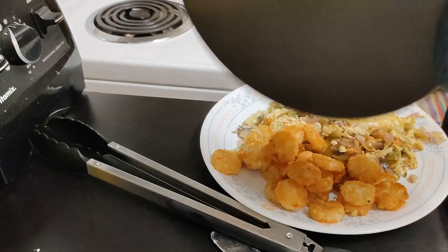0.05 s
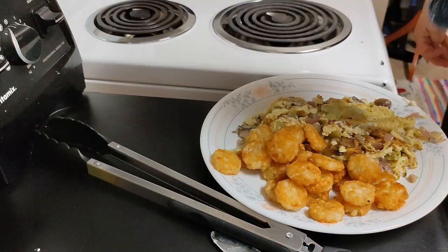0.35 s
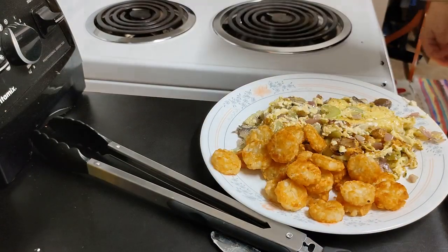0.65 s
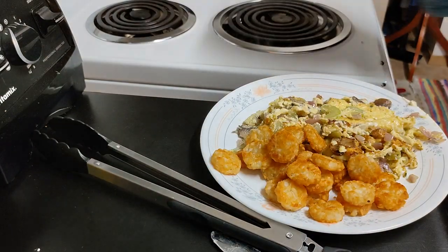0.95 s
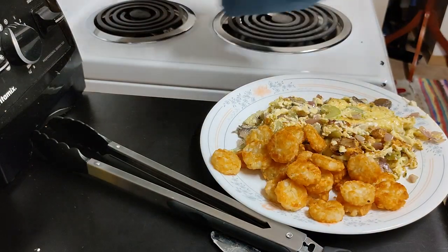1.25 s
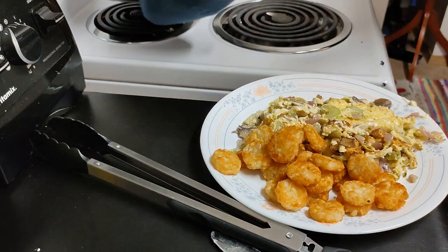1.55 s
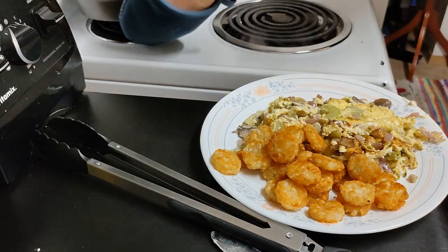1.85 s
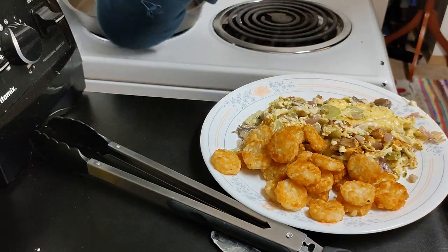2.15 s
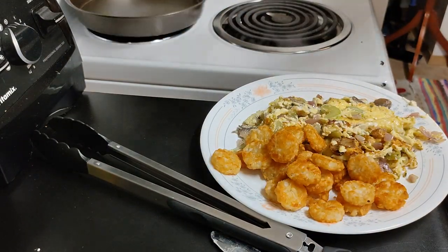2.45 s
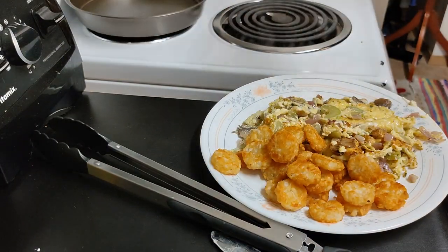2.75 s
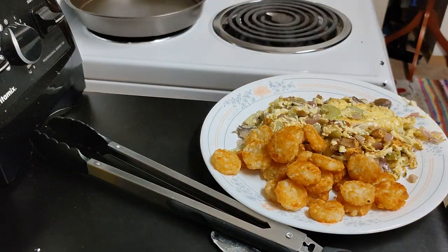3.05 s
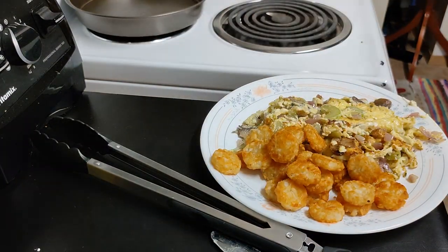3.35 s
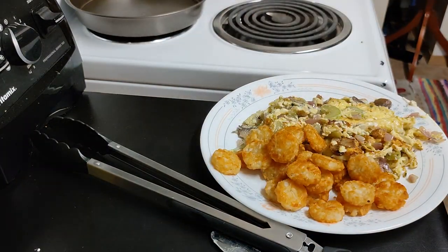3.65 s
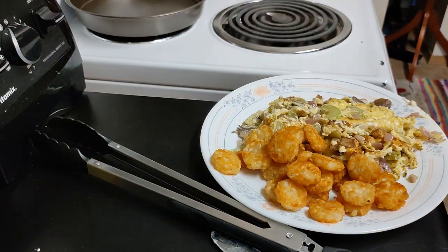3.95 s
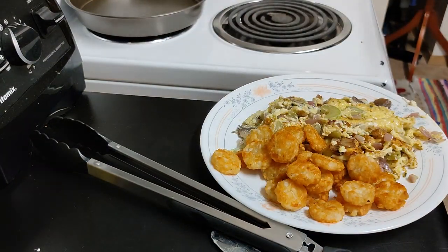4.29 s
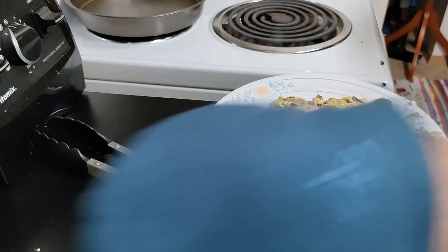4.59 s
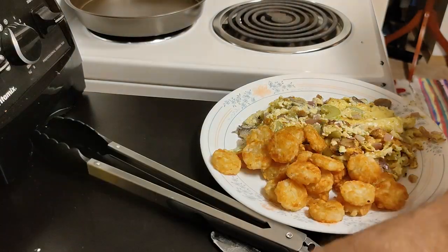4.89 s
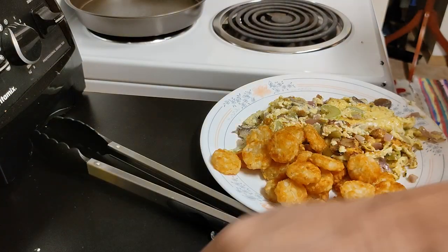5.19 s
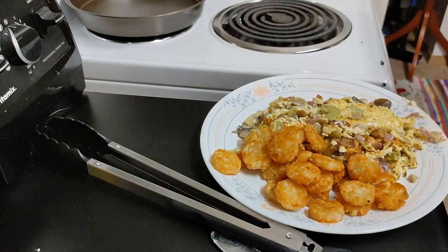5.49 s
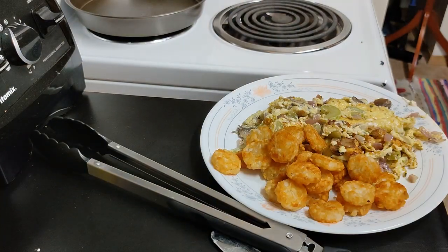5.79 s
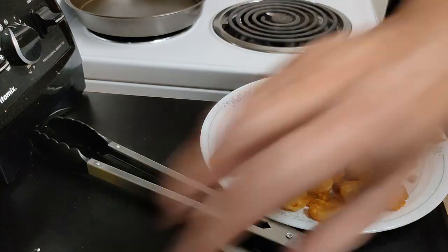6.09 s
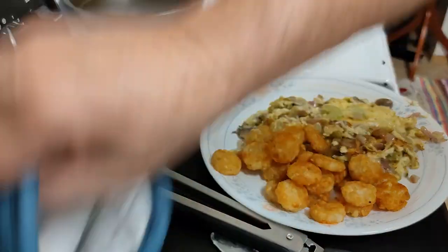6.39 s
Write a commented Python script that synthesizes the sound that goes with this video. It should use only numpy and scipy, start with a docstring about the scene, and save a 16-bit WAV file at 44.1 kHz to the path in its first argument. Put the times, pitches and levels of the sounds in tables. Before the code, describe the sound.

A steel pan clatters and rings onto a stove burner, followed by soft rustles and a padded thump in a quiet kitchen.

```python
"""In a small kitchen, a steel pan, just emptied onto a plate, is put back on an electric coil burner.
It strikes the coil and rings, then is pushed to the middle: it sticks and slips, the coil chatters
in its drip bowl and the sheet-metal stove top booms. Around it are soft swishes of the cook's clothes
and soles, small ticks, a tiny squeak and a padded thump on the counter. Cupboards and walls add a short
echo, and behind it all is a steady low hum of air, mains power and a fan motor."""
import sys
import numpy as np
from scipy import signal
from scipy.fft import rfft, irfft
from scipy.io import wavfile
from scipy.ndimage import uniform_filter1d

SR = 44100
rng = np.random.default_rng(int(sys.argv[2]) if len(sys.argv) > 2 else 0)


def unload_wav(signal):
    """Save mono or channel-first audio to the path in sys.argv[1] as 16-bit WAV at rate SR, clipped to [-1, 1]."""
    wavfile.write(
        sys.argv[1],
        SR,
        np.round(np.clip(np.atleast_2d(signal).T, -1, 1) * 32767).astype(np.int16),
    )


N = 283563
TIME = np.arange(N) / SR
TOP_HZ = 8600  # the treble ends here


# The pan lands on the coil, then rocks: t/s, clink level/dB, weight (boom compared with clink)/dB
PAN_HITS = [(1.8438, -27, -29.5), (1.848, -25, -15), (1.869, -39.5, 1.5), (1.884, -31.5, -10),
            (1.978, -36.5, -22.5), (2.0885, -45, -7), (2.194, -38, -44), (2.211, -40.5, -9),
            (2.233, -43, 0.5), (2.280, -27.5, -19.5), (2.320, -31, -9), (2.355, -28, -19.5),
            (2.403, -31.5, -16), (2.435, -36.5, -19), (2.500, -38, -17.5), (2.526, -43.5, -5),
            (2.579, -41, -12.5), (2.66, -51, -2.5), (2.722, -51, -15.5), (2.878, -73.5, 13)]

def pan_hits(flat_from_s=2.15, heavy_db=-42, stove_hz=862, rim_hz=6080, boom_rise_s=0.00063):
    """Each hit rings the steel. The more weight behind it, the more clank and boom join the clink."""
    out, attack = np.zeros(N), slice(SR // 30)
    for s, clink_db, weight_db in PAN_HITS:
        # heavy hits bring out the stove top, light ones the rim
        hz = stove_hz if clink_db + weight_db > heavy_db else rim_hz
        ring = steel_ring(flat=s > flat_from_s)
        ring = favour_pitch(ring, hz, boost_db=6.5, width_hz=190, patchy_db=4)
        boom, rest = split(ring, 1500)
        clank, clink = split(rest, 5000)
        boom = boom * (1 - np.exp(-TIME[:SR] / boom_rise_s))  # the stove top takes a moment to follow
        for band, db in (clink, 0), (clank, -3 + 0.56 * weight_db), (boom, weight_db):
            add(out, s, amp(clink_db + db) * band / rms(band[attack]))
    return out


# Clear notes of pan, coil and drip bowl, and the stove top's low boom at 146 Hz: f/Hz, level with pan on
# edge/dB, level with pan flat/dB
STEEL_NOTES = [(146, -16, -16), (600, -22, -14), (750, -11, -12), (845, -7, -18), (892, -11, -14),
               (980, -6, -16), (1400, -18, -17), (1620, -21, -17), (1715, -15, -13), (2052, -9, -17),
               (2480, -22, -15), (2818, -16, -17), (3405, -17, -21), (3680, -20, -9), (3833, -16, -13),
               (3940, -14, -15), (4204, -24, -8), (4651, -13, -25), (4753, -20, -15), (5297, -22, -10),
               (5612, -17, -14), (5852, -5, -3), (5935, -7, -15), (6170, -8, -8), (6312, -4, -10),
               (6365, -6, -9), (6563, -15, -9), (6670, -15, -6), (6895, -9, -17), (7240, -9, -14)]
# The clang, a blur of weaker steel notes: f/Hz, level/dB
CLANG_COLOUR = [(50, -27.5), (90, -14), (150, -15.5), (300, -9), (500, -10.5), (880, -7.5), (1250, -10.5),
                (1900, -6.5), (2350, -13.5), (3000, -9), (4800, -9), (5600, -1), (6300, -3), (7500, -0.5)]
# How long the clang lasts: f/Hz, time to fade by 60 dB/s
CLANG_FADE = [(150, 0.32), (800, 0.5), (2500, 0.4), (6500, 0.33)]

def steel_ring(flat, notes_db=-4.5, edge_fade_s=0.24, flat_fade_s=0.27, crack_db=3, crack_s=0.00062):
    """Struck steel gives a crack, a clang and clear notes whose mix depends on how the pan sits."""
    t = TIME[:SR]
    contact = grains(SR, spread_db=3) * (1 + amp(crack_db) * np.exp(-t / crack_s))
    clang = die_away(colour(contact, CLANG_COLOUR), CLANG_FADE)
    notes = sum(amp(flat_db if flat else edge_db) * sine(hz, t) for hz, edge_db, flat_db in STEEL_NOTES)
    notes *= amp(-60 * t / (flat_fade_s if flat else edge_fade_s))
    return clang / rms(clang) + amp(notes_db) * notes / rms(notes)


def push_force(start_s=2.205, peak_s=2.285, stop_s=2.7, rise_db_per_s=152.5, ease_db_per_s=72.5):
    """The hand's push grows quickly to a peak of 1, then eases off until the pan rests."""
    t = TIME - peak_s
    db = np.minimum(rise_db_per_s * t, -ease_db_per_s * t)
    return amp(db) * (TIME > start_s) * (TIME < stop_s)


def pan_slide(peak_db=-29.5, slips_per_s=300, spots=4):
    """The pushed pan sticks and slips on the coil, rapping it at a few spots."""
    out, force = np.zeros(N), amp(peak_db) * push_force()
    for _ in range(spots):
        strengths = 2 * rng.random(N) - 1
        slips = strengths * (rng.random(N) < slips_per_s / spots / SR)
        out += ring_through(force * slips / rms(slips), steel_ring(flat=True))
    return out / np.sqrt(spots)


def rim_skid(start_s=2.194, length_s=0.075, release_s=0.012, db=-35.5, hz=6560):
    """The rim skids on the coil with a short, bright scrape."""
    out, t = np.zeros(N), TIME[:SR // 5]
    scrape = favour_pitch(grains(len(t), spread_db=2.5), hz, boost_db=33, width_hz=620, patchy_db=8)
    release = np.exp(-np.maximum(t - length_s, 0) / release_s)
    add(out, start_s, amp(db) * scrape * release)
    return out


def rim_ping(start_s=2.722, db=-53, hz=5740, beat_hz=85, fade_s=0.36):
    """Two close notes of the rim beat against each other, so the ping flutters as it fades."""
    out, t = np.zeros(N), TIME[:SR]
    pair = np.sin(2 * np.pi * hz * t) + 0.5 * np.sin(2 * np.pi * (hz + beat_hz) * t)
    add(out, start_s, amp(db) * pair * amp(-60 * t / fade_s))
    return out


# The stove top's rumble under the sliding pan: f/Hz, level/dB
RUMBLE_COLOUR = [(30, -29.5), (68, -6.5), (100, -16.5), (145, 1), (250, -7.5), (420, -6.5), (1200, -43),
                 (3000, -68)]

def stove_rumble(peak_db=-53.5, follow=0.36):
    """The push shakes the sheet-metal stove top, whose rumble swells and fades with it."""
    rumble = colour(rng.standard_normal(N), RUMBLE_COLOUR)
    return amp(peak_db) * push_force() ** follow * rumble / rms(rumble)


# The stove top takes the pan's weight: t/s, level/dB, f/Hz
STOVE_THUMPS = [(2.211, -39, 658), (2.256, -41, 148.8), (2.32, -47, 146.8)]
# Something padded flops onto the counter: t/s, level/dB, f/Hz
COUNTER_THUMPS = [(4.937, -35, 130), (4.958, -34, 244), (4.967, -34, 142), (4.994, -41.5, 146)]

def thumps(stove_cycles=97, counter_cycles=14):
    """The thumped stove top rings on for many swings; the counter stops after a few."""
    out = np.zeros(N)
    for table, cycles in (STOVE_THUMPS, stove_cycles), (COUNTER_THUMPS, counter_cycles):
        for s, db, hz in table:
            add(out, s, amp(db) * bump(hz, fade_s=cycles / hz))
    return out


def bump(hz, fade_s, rise_s=0.0003, puff_db=-14, puff_s=0.006, puff_hz=700):
    """A soft knock sets a panel swinging, with a dull puff of noise."""
    t = TIME[:SR // 4]
    swing = -np.sin(2 * np.pi * hz * t) * amp(-60 * t / fade_s)
    puff, _ = split(rng.standard_normal(len(t)), puff_hz)
    puff = amp(puff_db) * puff / rms(puff) * np.exp(-t / puff_s)
    return (1 - np.exp(-t / rise_s)) * (swing + puff)


# Scuffs of cloth and soles: peak t/s, level/dB, rise time/s, boost of the lower part (body)/dB
COOK_SWISHES = [(.588, -52.5, .017, -12), (0.674, -43, .024, -4), (.975, -39.5, 0.0072, -2),
                (1.166, -45.5, .02, -4.5), (3.428, -45.5, .024, -2.5), (4.52, -62, .12, -4.5),
                (4.75, -60.5, .055, -2), (4.892, -46, .021, -2.5), (4.954, -46.5, .018, -2),
                (5.27, -65, .04, -10), (5.68, -64, 0.18, 1.5), (5.885, -53, .026, 4),
                (6.111, -62.5, 0.035, 8), (6.386, -56.5, 0.045, 3)]

def swishes(fall_per_rise=1.1):
    """The cook moves, and each short rub fades about as fast as it swells."""
    out = np.zeros(N)
    for peak_s, db, rise_s, body_db in COOK_SWISHES:
        start_s = max(peak_s - 3 * rise_s, 0)
        t = TIME[:SR] + start_s - peak_s
        swell = np.exp(-(np.minimum(t, 0) / rise_s) ** 2)
        fade = np.exp(-np.maximum(t, 0) / (fall_per_rise * rise_s))
        add(out, start_s, amp(db) * swell * fade * scuff_noise(len(t), body_db, spread_db=3))
    return out


# Small taps and clicks: t/s, level/dB, boost of the body/dB, f/Hz that the tapped thing favours
SMALL_TAPS = [(.929, -46.5, 2, 6370), (.9635, -44, 4.5, 3580), (1.154, -57, -9, 6300),
              (1.624, -62, 6, 6500), (2.901, -64.5, 11, 5100), (3.414, -51, -10, 6400),
              (4.363, -59, -16, 6700), (4.973, -52.5, 1.5, 900), (5.5193, -49.5, 1.5, 6100),
              (6.046, -56.5, 4, 3050), (6.387, -53, -1.5, 1990)]

def ticks(snap_db=7.5, snap_s=0.0027, bounce_s=0.0053, ring_db=-6, ring_s=0.047, knock_db=-12.5):
    """A tapped thing snaps, bounces once, rings briefly and knocks on the surface below."""
    out, t = np.zeros(N), TIME[:SR // 6]
    bounce = (t > bounce_s) * np.exp(-abs(t - bounce_s) / snap_s)
    snap_shape = amp(snap_db) * (np.exp(-t / snap_s) + bounce)
    ring_shape = amp(ring_db) * np.exp(-t / ring_s)
    for s, db, body_db, hz in SMALL_TAPS:
        noise = scuff_noise(len(t), body_db, spread_db=1)
        ring = favour_pitch(noise, 2100, boost_db=1, width_hz=260, patchy_db=3)
        snap = favour_pitch(ring, hz, boost_db=10.5, width_hz=630, patchy_db=0.5)
        add(out, s, amp(db) * (snap_shape * snap + ring_shape * ring))
        add(out, s, amp(db + body_db + knock_db) * bump(hz=622, fade_s=0.09))
    return out


# The mix of low and high in scuffs and taps: f/Hz, level/dB
SCUFF_COLOUR = [(100, -13.5), (350, -10.5), (700, -9), (1400, -13), (2300, -10.5), (3600, -7), (4800, -6.5),
                (6300, 3.5), (7400, 0.5)]

def scuff_noise(count, body_db, spread_db):
    """Rubbing makes a grainy hiss with more or less body below it."""
    noise = colour(grains(count, spread_db), SCUFF_COLOUR)
    body, hiss = split(noise / rms(noise), hz=4000)
    return hiss + amp(body_db) * body


def squeak(start_s=0.33, length_s=0.048, hz=3490, glide_hz=90, waver_hz=70, db=-61):
    """A tiny squeak rises in pitch, a little unsteadily."""
    out, progress = np.zeros(N), np.linspace(0, 1, int(length_s * SR))
    waver = uniform_filter1d(rng.standard_normal(N), size=100)[:len(progress)]
    pitch = hz + glide_hz * progress + waver_hz * waver / rms(waver)
    tone = np.sin(2 * np.pi * np.cumsum(pitch) / SR)
    add(out, start_s, amp(db) * np.sin(np.pi * progress) * tone)
    return out


# Steady kitchen air: f/Hz, level/dB
AIR_COLOUR = [(25, -30.5), (58, -17), (95, -34.5), (125, -10.5), (160, -0.5), (220, -0.5), (270, -7),
              (335, -5), (400, -14), (560, -21), (860, -20), (2000, -34), (4500, -29.5), (6500, -20.5)]

def air(db=-55.5, waver_db=2.2):
    """The air carries a low, fan-like rumble and a thin hiss that wavers slowly."""
    noise = colour(rng.standard_normal(N), AIR_COLOUR)
    rumble, hiss = split(noise / rms(noise), 3600)
    drift = sum(sine(hz, TIME) / np.sqrt(hz) for hz in np.geomspace(0.4, 9, 20))
    return amp(db) * (rumble + amp(-waver_db * drift / rms(drift)) * hiss)


# Tones of the mains power and a fan motor: f/Hz, level/dB
HUM_TONES = [(59.5, -88), (120, -75), (165, -66.5), (1241, -86.5)]

def hum():
    """The mains and the motor hum faintly, each tone at a steady pitch."""
    return np.sqrt(2) * sum(amp(db) * sine(hz, TIME) for hz, db in HUM_TONES)


# How long the kitchen's echo lasts: f/Hz, time to fade by 60 dB/s
ECHO_FADE = [(150, 0.39), (800, 0.32), (2500, 0.38), (6500, 0.34)]

def kitchen_echo(x, first_s=0.004, echoes_per_s=3000):
    """Sound bounces off cupboards and walls as many tiny echoes that blur together."""
    signs = rng.choice([-1., 1.], SR)
    echoes = signs * (rng.random(SR) < echoes_per_s / SR) * (TIME[:SR] > first_s)
    return ring_through(x, die_away(echoes, ECHO_FADE))


def amp(db):
    """Turns decibels into a number to multiply by."""
    return 10 ** (np.asarray(db) / 20)


def rms(x):
    """The average strength of a sound (root mean square)."""
    return np.sqrt(np.mean(x ** 2) + 1e-20)


def sine(hz, t):
    """A pure tone that starts at a random point in its swing."""
    return np.sin(2 * np.pi * (hz * t + rng.random()))


def look_up(table, hz):
    """Reads between a table's rows, on a scale of octaves."""
    f, value = np.transpose(table)
    return np.interp(np.log(hz + 1), np.log(f + 1), value)


def add(mix, s, sound):
    """Mixes a sound in at s seconds."""
    part = mix[max(round(s * SR), 0):][:len(sound)]
    part += sound[:len(part)]


def ring_through(x, tail):
    """Every sample of x sets off its own copy of the tail."""
    return signal.oaconvolve(x, tail / np.linalg.norm(tail))[:N]


def colour(x, table):
    """Turns each frequency up or down as the table says, and drops all above TOP_HZ."""
    hz = np.fft.rfftfreq(2 * len(x), 1 / SR)
    return irfft(rfft(x, 2 * len(x)) * amp(look_up(table, hz)) * (hz < TOP_HZ))[:len(x)]


def favour_pitch(x, hz, boost_db, width_hz, patchy_db):
    """A contact brings out the notes near hz, and others in random patches."""
    f = np.fft.rfftfreq(2 * len(x), 1 / SR)
    patch_hz = np.arange(0, SR, 110)
    patches = np.interp(f, patch_hz, rng.standard_normal(len(patch_hz)))
    peak = np.exp(-((f - hz) / width_hz) ** 2)
    shaped = irfft(rfft(x, 2 * len(x)) * amp(boost_db * peak + patchy_db * patches))[:len(x)]
    return shaped * rms(x) / rms(shaped)


def split(x, hz):
    """The low part of x, below hz, and what remains."""
    low = signal.sosfiltfilt(signal.butter(4, hz, fs=SR, output="sos"), x, padtype=None)
    return low, x - low


def die_away(x, fade_table):
    """Lets each frequency fade at its own speed."""
    hz, t, bands = signal.stft(x, SR, nperseg=256)
    fades = amp(-60 * t / look_up(fade_table, hz)[:, None])
    return signal.istft(bands * fades, SR, nperseg=256)[1][:len(x)]


def grains(count, spread_db):
    """The noise of many tiny contacts of uneven size, count samples long."""
    sizes = np.repeat(rng.standard_normal(count), 16)[:count]
    noise = rng.standard_normal(count) * amp(spread_db * sizes)
    return noise / rms(noise)


def scene(pan_echo_db=-10, small_echo_db=-3, thump_echo_db=-12):
    """Puts all the sounds in one kitchen; the pan, swishes, ticks and thumps get an echo."""
    pan = pan_hits() + rim_skid() + pan_slide() + stove_rumble() + rim_ping()
    small, thump = swishes() + ticks(), thumps()
    echo = kitchen_echo(amp(pan_echo_db) * pan + amp(small_echo_db) * small + amp(thump_echo_db) * thump)
    return (pan + small + thump + squeak() + echo + air() + hum())[None]


# How strongly the microphone hears each frequency: f/Hz, level/dB
MIC_COLOUR = [(20, -33.5), (50, 0.5), (70, -0.5), (7000, -3.5), (7500, -10), (7900, -24), (8300, -38),
              (8600, -44)]

def record(dry):
    """The microphone loses the deepest bass and cuts off the highest treble steeply."""
    heard = colour(dry[0], MIC_COLOUR)
    treble_cut = signal.firwin(511, TOP_HZ, window=("kaiser", 9), fs=SR)
    return signal.oaconvolve(heard, treble_cut, "same")[None]


dry = scene()
out = record(dry)
unload_wav(out)
```